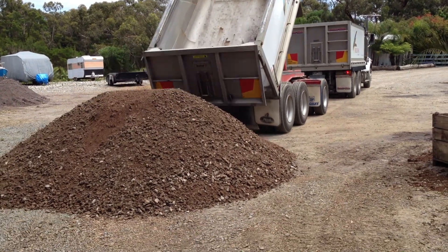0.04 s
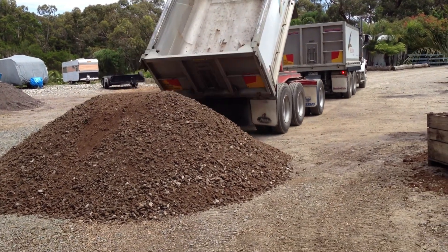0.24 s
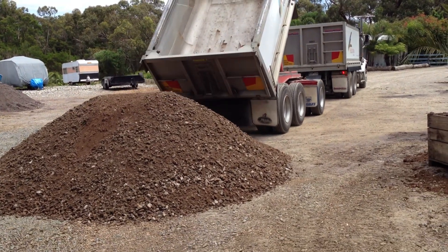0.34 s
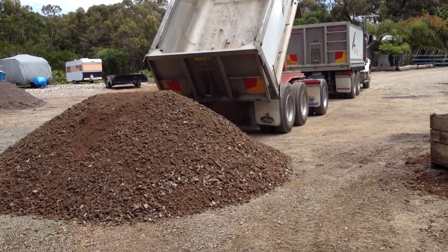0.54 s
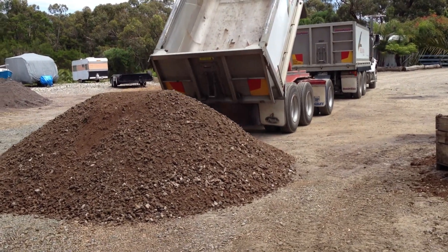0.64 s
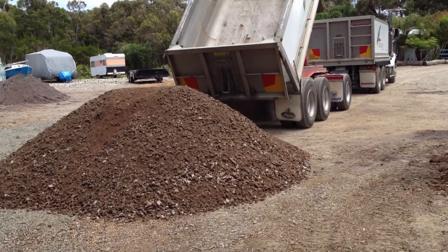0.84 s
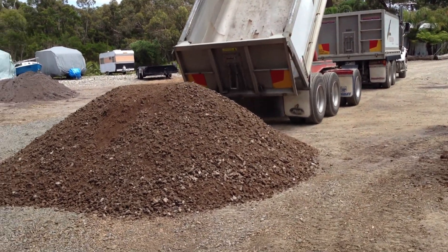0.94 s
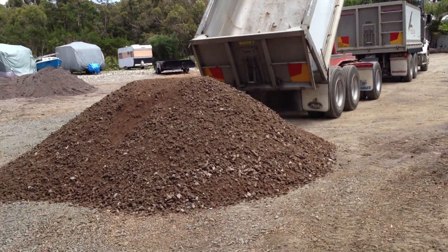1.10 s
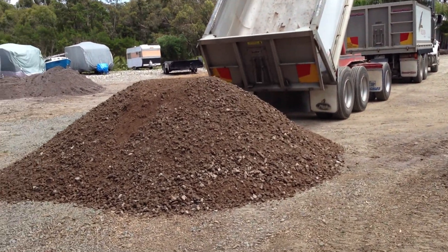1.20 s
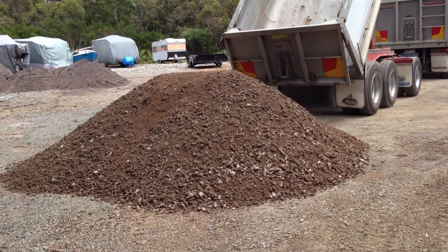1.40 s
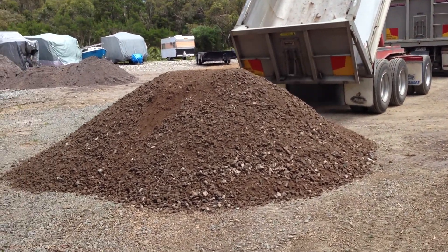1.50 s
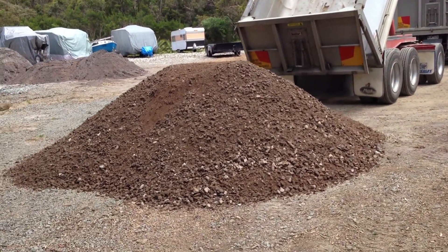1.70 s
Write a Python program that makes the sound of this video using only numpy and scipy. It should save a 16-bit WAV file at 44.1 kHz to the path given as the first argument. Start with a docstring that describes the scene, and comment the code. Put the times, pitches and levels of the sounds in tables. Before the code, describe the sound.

A tipper truck's steel tailgate slams loudly at about 0.35 seconds and rings away over roughly a second. Just before it, the tray shudders low and latches clank. Sliding gravel rattles underneath, fading by 0.8 seconds, when another sharp chain clank comes. A hinge gives two tiny squeaks just after 1 second, and faint clinks continue until about 1.7 seconds. A distant engine murmurs faintly throughout.

```python
"""A tipper truck's steel tailgate slams against the raised tray and rings on.
Sheet ring is band noise plus decaying modes. The tray floor shudders at a low panel mode.
Latches and chains clank unevenly, loudest just before the slam and half a second after it,
then thin out to faint clinks. A hinge pin squeaks twice.
Gravel slides off, rattling the tray and ticking on the steel. The engine murmurs underneath."""
import sys
import numpy as np
from scipy import signal
from scipy.io import wavfile
from scipy.ndimage import uniform_filter1d

SR = 44100
rng = np.random.default_rng(int(sys.argv[2]) if len(sys.argv) > 2 else 0)


def inscribe(sig):
    """Save sig as 16-bit PCM at rate SR to the path in sys.argv[1].

    A 1-D sig is mono; a 2-D sig holds one channel per row.
    Samples are clipped to [-1, 1] before scaling.
    """
    pcm = np.round(np.clip(np.atleast_2d(sig).T, -1, 1) * 32767)
    wavfile.write(sys.argv[1], SR, pcm.astype(np.int16))


N = 77175
TIME_S = np.arange(N) / SR
EDGES_HZ = np.geomspace(22, 17500, 29)
BANDS_HZ = np.sqrt(EDGES_HZ[1:] * EDGES_HZ[:-1])

# engine and yard spectrum (frequency [Hz], relative density [dB])
ENGINE_SPECTRUM = [(25, -36), (70, -25), (130, -3), (275, 4.5), (420, -3), (900, 1.5), (1400, -5),
                   (5000, -13.5), (15000, -21.5)]

# gravel slide envelope (time [s], level [dB])
SLIDE_ENVELOPE = [(0, -39), (0.09, -35.5), (0.14, -39), (0.21, -33), (0.4, -28.5), (0.8, -50.5),
                  (1.75, -70.5)]
# tray rattle spectrum (frequency [Hz], relative density [dB])
RATTLE_SPECTRUM = [(30, -31), (90, -10), (190, 7), (300, 1.5), (600, -0.5), (2500, -7.5), (15000, -22)]

# tray shudders (time [s], level [dB], rise [s], pitch [Hz])
TRAY_SHUDDERS = [(0.014, -40, 0.024, 200), (0.223, -24.5, 0.028, 189), (0.28, -33, 0.016, 196),
                 (0.484, -46.5, 0.0065, 197), (0.74, -40, 0.011, 150)]
# shudder rumble spectrum (frequency [Hz], relative density [dB])
RUMBLE_SPECTRUM = [(30, -23), (80, -26), (135, 4.5), (215, 10.5), (310, -18)]

# latch and chain contacts, plus the tailgate's second strike at 0.362 s (time [s], ring level [dB], rise [s],
# bass slope [dB/oct], # treble slope [dB/oct], ping level [dB], ping pitch [Hz])
CONTACTS = [ (0.075, -40, 0.006, -3.5, 0, -39, 824), (0.2323, -29.5, 0.0019, -13, -5, -17, 9160),
            (0.268, -18, 0.0011, 0, -2.5, -13, 7400), (0.2725, -30.5, 0.0037, -0.5, -1, -19.5, 2300),
            (0.302, -23, 0.022, -20, -4, -29, 4500), (0.3442, -27.5, 0.0022, 10, -1, -12.5, 4320),
            (0.362, -31, 0.0022, -8, -4, -12.5, 2680), (0.556, -30, 0.021, -42, -0.5, -37, 7800),
            (0.647, -28, 0.00085, -6, -8, -28, 5240), (0.7207, -33, 0.0033, -4, 0, -29, 4060),
            (0.8372, -18, 0.0016, -0.5, -4, -17.5, 7850), (0.9593, -46, 0.0025, -6, 3.5, -39.5, 11100),
            (1.024, -24, 0.00027, -4, 0.5, -23.5, 3980), (1.259, -37.5, 0.00038, -48, 5.5, -26.5, 11200),
            (1.311, -47.5, 0.0027, 0.5, -10, -42.5, 4900), (1.4445, -50, 0.00055, -21, -6, -48.5, 6100),
            (1.474, -50, 0.017, -7, -3, -51, 5600), (1.5428, -51, 0.0024, -2, -20, -45, 4130),
            (1.6263, -35, 0.0049, -9, -2, -49, 4500)]
# contact ring spectrum (frequency [Hz], relative density [dB])
CONTACT_SPECTRUM = [(60, -47), (600, -11.5), (1200, -4), (2300, 2.5), (4200, 0.5), (5600, -1.5),
                    (7800, -0.5), (15000, -7.5)]
# contact ring decay (frequency [Hz], t60 [s])
CONTACT_DECAY = [(500, 0.56), (2500, 0.11)]
# contact tail decay (frequency [Hz], t60 [s])
CONTACT_TAIL_DECAY = [(800, 0.34), (4000, 0.54), (14000, 0.27)]
# hollow modes of the fittings (frequency [Hz], relative level [dB])
LATCH_MODES = [(598, -20.5), (757, -20.5), (860, -20), (1005, -21), (1130, -15), (1217, -22.5),
               (1785, -13.5), (1852, -23), (2160, -22)]

# tailgate slam (time [s], level [dB], rise [s])
GATE_SLAMS = [(0.3445, -12.5, 0.0055)]
# sheet crash spectrum (frequency [Hz], relative density [dB])
CRASH_SPECTRUM = [(30, -9), (75, -15), (135, 4), (450, -4.5), (650, -4), (900, -3), (2800, -4),
                  (5000, -5.5), (7500, -14), (15000, -41)]
# sheet crash decay (frequency [Hz], t60 [s])
CRASH_DECAY = [(80, 0.084), (300, 0.39), (3000, 0.34)]
# slam tail spectrum (frequency [Hz], relative density [dB])
SLAM_TAIL_SPECTRUM = [(50, -55), (190, 10), (300, 4), (600, 7), (900, -2), (2400, 3.5), (5000, -2),
                      (15000, -42)]
# slam tail decay (frequency [Hz], t60 [s])
SLAM_TAIL_DECAY = [(80, 1.1), (200, 1.18), (10000, 0.48)]
# prominent tray modes (frequency [Hz], relative level [dB], t60 [s])
SLAM_MODES = [(197, -20, 0.51), (357.6, -19, 1.32), (509, -22.5, 1), (557, -15, 0.57), (614, -17, 0.58),
              (2195, -24, 0.38), (2400, -14.5, 0.63), (2660, -13, 0.25), (2900, -9.5, 0.22),
              (4500, -11, 0.14)]

# hinge pin squeaks (time [s], length [s], level [dB])
HINGE_SQUEAKS = [(1.029, 0.021, -30), (1.083, 0.013, -45.5)]


def from_db(db):
    """dB to gain."""
    return 10 ** (np.asarray(db) / 20)


def unit_rms(x):
    """Scale to unit power."""
    return x / np.sqrt(np.mean(x ** 2, axis=-1, keepdims=True) + 1e-20)


def per_band(table):
    """(frequency [Hz], value) table to one row per band."""
    hz, value = np.transpose(table)
    return np.interp(np.log(BANDS_HZ), np.log(hz), value)[:, None]


def band_gains(spectrum):
    """Density table to band gains, total power one."""
    gain = from_db(per_band(spectrum)) * np.sqrt(np.diff(EDGES_HZ))[:, None]
    return gain / np.sqrt(np.sum(gain ** 2))


def noise_bands():
    """Unit-power third-octave noises: dense overlapping modes."""
    white = rng.standard_normal((2, N + SR // 2))
    filters = [signal.butter(3, EDGES_HZ[k:k + 2], "band", fs=SR, output="sos")
               for k in range(len(BANDS_HZ))]
    return unit_rms(np.array([signal.sosfilt(sos, white[k % 2])[-N:] for k, sos in enumerate(filters)]))


def steel_bands():
    """Noise bands with slow swells levelled, for a steady decay."""
    spans = np.maximum(3 * SR / np.diff(EDGES_HZ), SR / 200).astype(int)
    return np.array([band / np.sqrt(uniform_filter1d(band ** 2, span) + 1e-3)
                     for band, span in zip(noise_bands(), spans)])


def blow(start_s, rise_s, t60_s):
    """Linear rise, exponential decay."""
    age_s, rise_s = TIME_S - start_s, max(rise_s, 3e-4)
    nepers = np.log(1000) * np.maximum(age_s - rise_s, 0) / t60_s
    return np.clip(age_s / rise_s, 0, 1) * np.exp(-np.minimum(nepers, 30))


def sine(hz):
    """Sine, random phase."""
    return np.sin(2 * np.pi * (hz * TIME_S + rng.random()))


def ring(modes, start_s, rise_s):
    """Decaying modes from one blow."""
    return sum(from_db(db) * blow(start_s, rise_s, t60_s) * sine(hz) for hz, db, t60_s in modes)


def wander(span_samples):
    """Smoothed noise, unit power."""
    return unit_rms(uniform_filter1d(rng.standard_normal(N), span_samples, mode="wrap"))


def wavering_tone(hz, deviation_hz, span_samples):
    """Unit-power tone, wandering pitch."""
    pitch_hz = hz + deviation_hz * wander(span_samples)
    return np.sqrt(2) * np.sin(2 * np.pi * np.cumsum(pitch_hz) / SR)


def engine():
    """Far engine murmur and yard air: steady shaped noise."""
    return from_db(-52.5) * (noise_bands() * band_gains(ENGINE_SPECTRUM)).sum(0)


def gravel(stones_per_s=210, spread_db=2.5, stones_db=-9):
    """The sliding load rattles the tray; single stones tick on the steel."""
    envelope = from_db(np.interp(TIME_S, *np.transpose(SLIDE_ENVELOPE)))
    rattle = (noise_bands() * band_gains(RATTLE_SPECTRUM)).sum(0)
    hits = rng.random(N) < stones_per_s / SR
    strength = from_db(spread_db * np.minimum(rng.exponential(1, N), 4))
    clicks = hits * strength * rng.choice([-1, 1], N)
    pitches_hz = np.geomspace(2000, 8500, 10)
    pitch_index = rng.integers(0, len(pitches_hz), N)
    stones = np.zeros(N)
    for k, hz in enumerate(pitches_hz):
        b, a = signal.iirpeak(hz, Q=4, fs=SR)
        stones += signal.lfilter(b, a, clicks * (pitch_index == k) + 1e-18) / np.sqrt(hz) * SR
    return envelope * (rattle + from_db(stones_db) * unit_rms(stones))


def shudders(rumble_db=1, second_db=-11.5, fourth_db=-13.5):
    """The tray floor booms at a panel mode, with buzzing overtones and a dull rumble."""
    rumble = from_db(rumble_db) * (steel_bands() * band_gains(RUMBLE_SPECTRUM)).sum(0)
    out = np.zeros(N)
    for start_s, db, rise_s, hz in TRAY_SHUDDERS:
        boom = sine(hz) + from_db(second_db) * sine(2 * hz) + from_db(fourth_db) * sine(4 * hz)
        out += from_db(db) * blow(start_s, rise_s, t60_s=0.14) * (rumble + np.sqrt(2) * boom)
    return out


def bass_octaves(hz, corner_hz=2440):
    """Octaves below the corner, two at most."""
    return np.clip(np.log2(corner_hz / hz), 0, 2)


def clank_envelope(start_s, rise_s, echo_s=0.029, rebound_s=0.0085):
    """Per-band power sum: contact, echo off body and ground, duller rebound, faint tail."""
    t60_s = per_band(CONTACT_DECAY)
    direct = blow(start_s, rise_s, t60_s)
    echo = from_db(-12.5) * blow(start_s + echo_s, rise_s, t60_s)
    rebound = from_db(-1.5) * blow(start_s + rebound_s, rise_s, t60_s=0.072) * (BANDS_HZ[:, None] < 5500)
    tail = from_db(-14) * blow(start_s, rise_s, per_band(CONTACT_TAIL_DECAY))
    return np.sqrt(direct ** 2 + echo ** 2 + rebound ** 2 + tail ** 2)


def clanks(treble_corner_hz=4320, mode_t60_s=0.25, ping_width_oct=0.18, ping_t60_cycles=172):
    """Latches and chains strike, and the tailgate strikes a second time just after the slam: the small part
    cracks and pings, steel and fittings ring."""
    steel, small_part = steel_bands(), steel_bands()
    hz = BANDS_HZ[:, None]
    treble_octaves = np.clip(np.log2(hz / treble_corner_hz), 0, 2)
    colour = band_gains(CONTACT_SPECTRUM)
    crack_noise = unit_rms((small_part * colour * np.sqrt(hz)).sum(0))
    out = np.zeros(N)
    for start_s, ring_db, rise_s, bass_db_oct, treble_db_oct, ping_db, ping_hz in CONTACTS:
        tilt = from_db(bass_octaves(hz) * bass_db_oct + treble_octaves * treble_db_oct)
        body = (steel * clank_envelope(start_s, rise_s) * colour * tilt).sum(0)
        modes = [(mode_hz, db + bass_octaves(mode_hz) * bass_db_oct, mode_t60_s)
                 for mode_hz, db in LATCH_MODES]
        out += from_db(ring_db) * (body + ring(modes, start_s, rise_s))
        ping_gains = np.exp(-(np.log2(hz / ping_hz) / ping_width_oct) ** 2 / 2)
        ping = unit_rms((small_part * ping_gains).sum(0)) * blow(start_s, 0, ping_t60_cycles / ping_hz)
        crack = from_db(-4) * crack_noise * blow(start_s, 0, t60_s=0.0035)
        out += from_db(ping_db) * (ping + crack)
    return out


def chatter(depth_db=2, span_s=0.0013):
    """Fast uneven gain: steel faces touch at many points in turn."""
    return from_db(depth_db * wander(int(span_s * SR)))


def tailgate(tail_db=-7.5, frame_db=-6):
    """Slam: sheet crash, long tail, hollow frame bonk, tray modes."""
    frame_tone = wavering_tone(671.7, deviation_hz=44.3, span_samples=SR // 100)
    crash_bands = steel_bands() * band_gains(CRASH_SPECTRUM)
    tail_bands = steel_bands() * band_gains(SLAM_TAIL_SPECTRUM)
    out = np.zeros(N)
    for start_s, db, rise_s in GATE_SLAMS:
        crash = (crash_bands * blow(start_s, rise_s, per_band(CRASH_DECAY))).sum(0)
        tail = from_db(tail_db) * (tail_bands * blow(start_s, rise_s, per_band(SLAM_TAIL_DECAY))).sum(0)
        bonk = from_db(frame_db) * frame_tone * blow(start_s, rise_s, t60_s=0.15)
        out += from_db(db) * (crash + tail + bonk + ring(SLAM_MODES, start_s, rise_s))
    return out


def hinge():
    """The pin squeaks briefly at one unsteady pitch."""
    envelope = np.zeros(N)
    for start_s, length_s, db in HINGE_SQUEAKS:
        progress = np.clip((TIME_S - start_s) / length_s, 0, 1)
        envelope += from_db(db) * np.sqrt(np.abs(np.sin(np.pi * progress)))
    return envelope * wavering_tone(2425, deviation_hz=30, span_samples=SR // 300)


def scene():
    """Mono sum of all sources."""
    return (tailgate() + shudders() + clanks() * chatter() + hinge() + gravel() + engine())[None, :]


def record(dry, cutoff_hz=15050):
    """Soft clip, steep low-pass."""
    lowpass = signal.ellip(10, .2, 80, cutoff_hz, fs=SR, output="sos")
    return signal.sosfilt(lowpass, np.tanh(dry))


dry = scene()
out = record(dry)
inscribe(out)
```